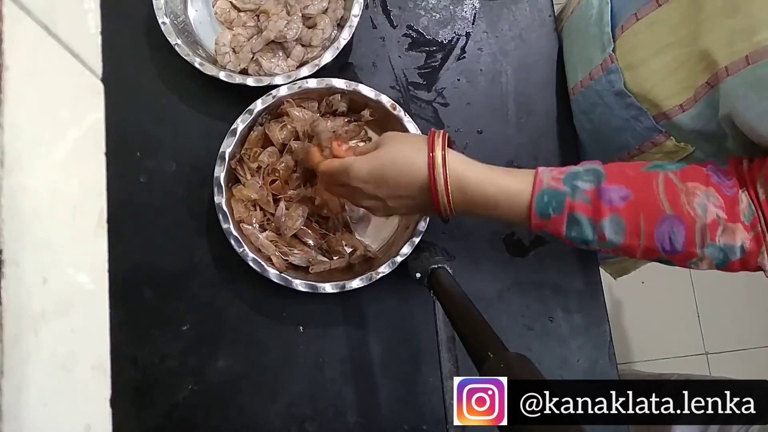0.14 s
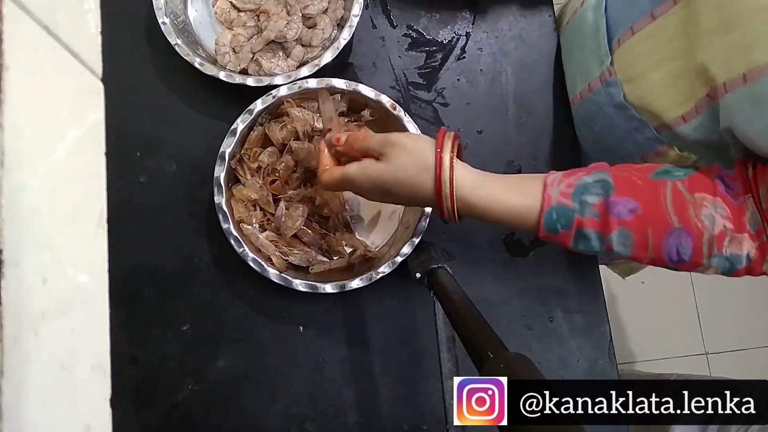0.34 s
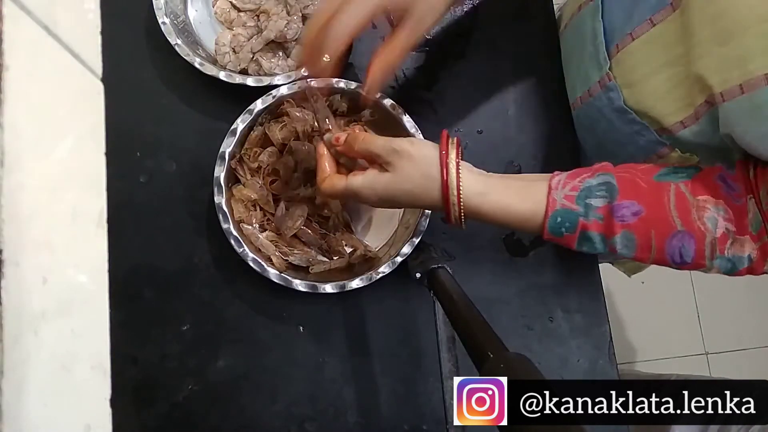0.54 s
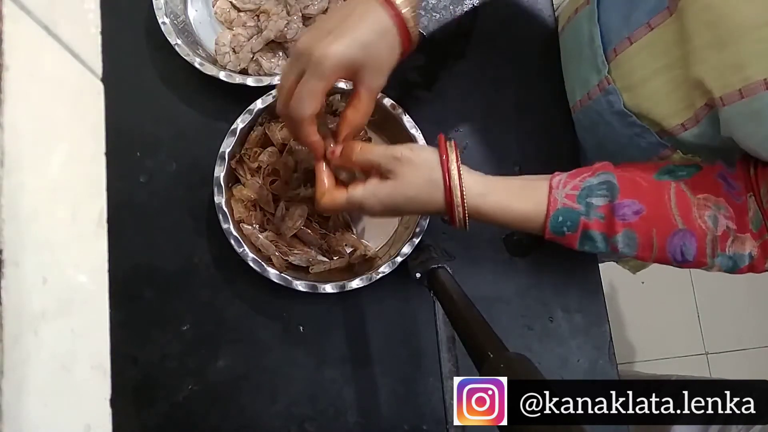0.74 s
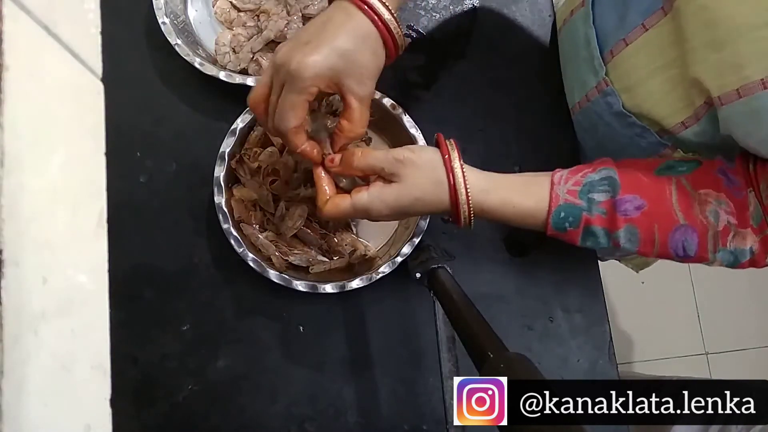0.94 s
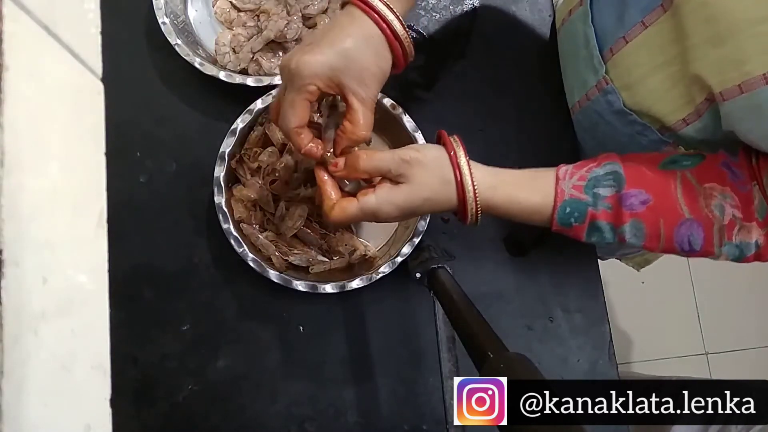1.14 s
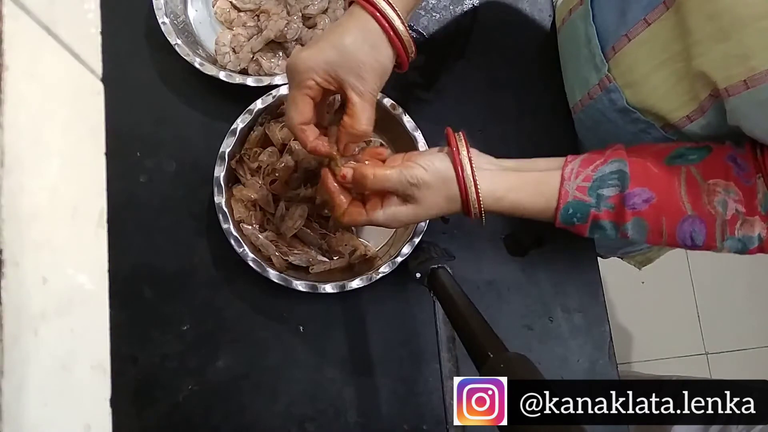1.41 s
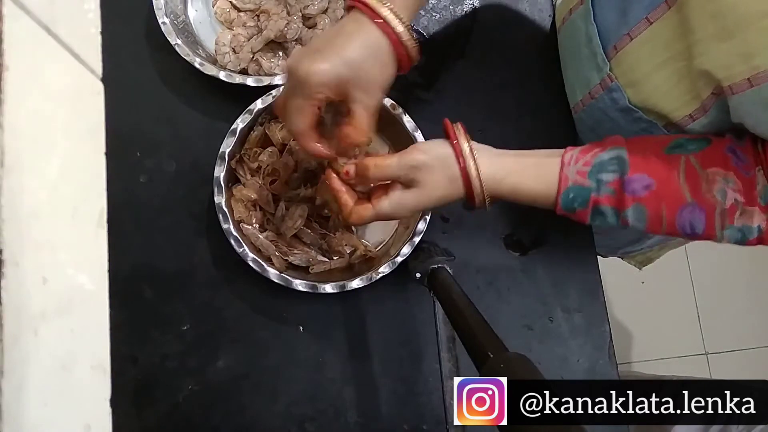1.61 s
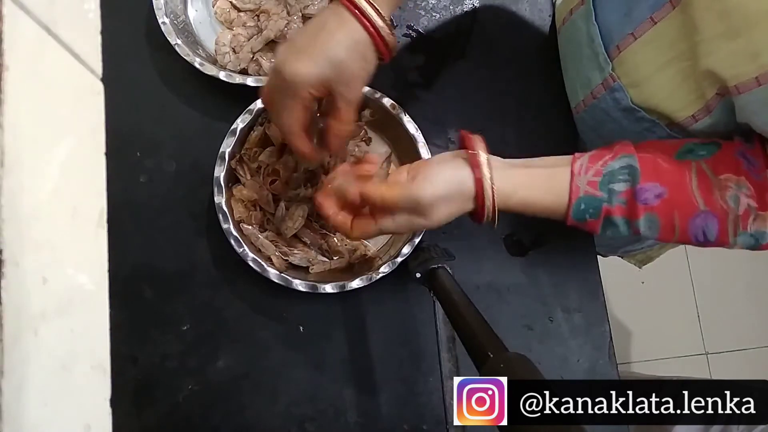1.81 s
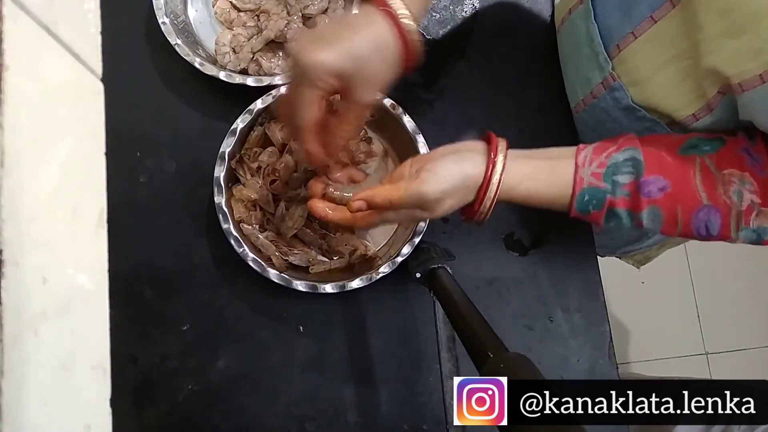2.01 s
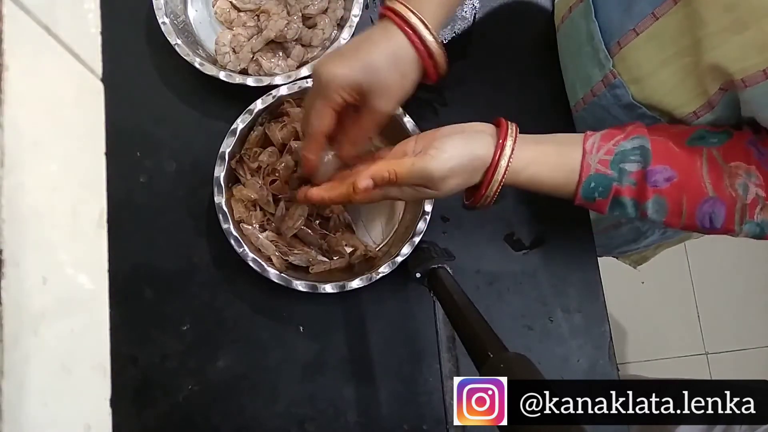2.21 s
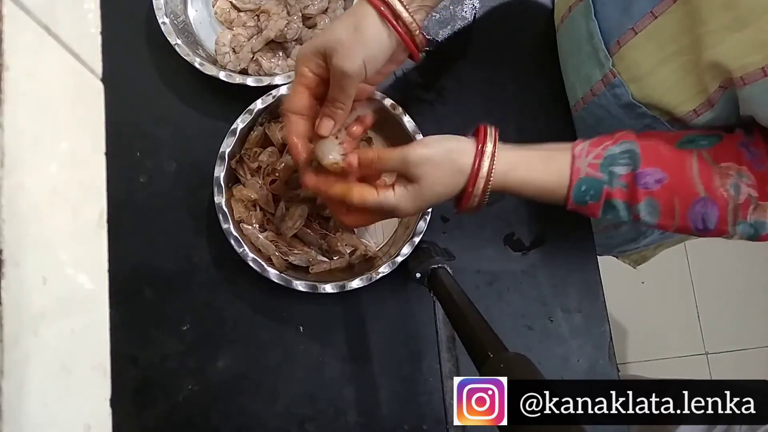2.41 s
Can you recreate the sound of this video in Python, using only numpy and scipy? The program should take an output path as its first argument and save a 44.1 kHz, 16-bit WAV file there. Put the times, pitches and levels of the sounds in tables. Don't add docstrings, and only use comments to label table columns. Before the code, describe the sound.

Prawn shells crackle wetly up close in irregular bright bursts, densest around 0.7 and 1.0 s, with snaps and slippery rubbing returning after 2 s. A distant steel dish clatters at 0.2 s, followed by dull bumps. Glass bangles clink, clearest near 0.7 and 2.0 s. A faint hinge whines early and again from 1.2 s; a faint insect joins at 1.4 s over motor hum, street murmur and gated phone hiss.

```python
import sys
import numpy as np
from scipy import signal
from scipy.fft import rfft, irfft
from scipy.io import wavfile
from scipy.ndimage import uniform_filter1d

SR = 44100
rng = np.random.default_rng(int(sys.argv[2]) if len(sys.argv) > 2 else 0)


def invert_db(level):
    return 10 ** (np.asarray(level, dtype=float) / 20)


def transcribe(signal):
    frames = np.atleast_2d(signal).T
    limited = np.clip(frames, -1, 1)
    pcm = np.round(limited * 32767).astype(np.int16)
    wavfile.write(sys.argv[1], SR, pcm)


N = 112454

# pitch_hz, level_db (per Hz)
SHELL_BRIGHT = [(5500, -14), (7500, -13.5), (9500, -1), (11200, 6.5), (13000, 0), (15000, 0.5),
                (16400, -18)]


def rms_one(x):
    return x / np.sqrt(np.mean(x ** 2) + 1e-20)


def at_hz(points, hz):
    table_hz, value = np.transpose(points)
    return np.interp(np.log(np.maximum(hz, 1)), np.log(table_hz), value)


def band(x, low_hz, high_hz, order=2):
    return signal.sosfilt(signal.butter(order, [low_hz, high_hz], "band", fs=SR, output="sos"), x)


def colour(x, spectrum):
    hz = np.fft.rfftfreq(N, 1 / SR)
    gain = invert_db(at_hz(spectrum, hz)) * (hz > spectrum[0][0]) * (hz < spectrum[-1][0])
    return irfft(rfft(x) * rms_one(gain), N)


def drift(rate_hz):
    r = np.exp(-2 * np.pi * rate_hz / SR)
    wander = signal.lfilter([1], [1, -2 * r, r * r], rng.standard_normal(N + SR))
    return rms_one(wander[SR:])


def burst(start_s, level_db, dying_s, rise_s):
    t = np.maximum(np.arange(N) / SR - start_s, 0)
    return (1 - np.exp(-t / rise_s)) * invert_db(level_db - 60 * t / dying_s)


def wide():
    # pitch_hz, left-right likeness (0 to 1)
    likeness = [(60, 1), (240, 0.77), (950, 0.12), (3770, 0.058), (15000, 0.12)]
    mid, side = rfft(rng.standard_normal((2, N)))
    alike = at_hz(likeness, np.fft.rfftfreq(N, 1 / SR))
    common = np.sqrt(1 + alike) * mid
    opposed = np.sqrt(1 - alike) * side * [[1], [-1]]
    return irfft((common + opposed) / np.sqrt(2), N)


def struck(hits, modes, spread_db, longest_s):
    chatter_s, waver_db, waver_hz = 0.01, 3.5, 25
    out = np.zeros(N)
    start_s, hit_db = np.transpose(hits)
    luck = rng.standard_normal((len(start_s), len(modes)))
    t = np.arange(600) / SR
    for k, (hz, level_db, t60) in enumerate(modes):
        clicks = np.full(N, 1e-18)
        clicks[(start_s * SR).astype(int)] = invert_db(hit_db + level_db + spread_db * luck[:, k])
        chatter = rng.standard_normal(len(t)) ** 2 * np.cos(2 * np.pi * hz * t)
        chatter = chatter * invert_db(-60 * t / chatter_s) * t ** 0.5
        push = abs(chatter @ np.exp(2j * np.pi * hz * t))
        clicks = signal.fftconvolve(clicks, chatter / push)[:N]
        r = invert_db(-60 / (min(t60, longest_s) * SR))
        w = 2 * np.pi * hz / SR
        ring = signal.lfilter([0, np.sin(w)], [1, -2 * r * np.cos(w), r * r], clicks)
        ring = ring * invert_db(waver_db * drift(waver_hz))
        out += band(ring, hz * 0.9, min(hz * 1.1, 20000))
    return out


def whine(path, octave_db):
    wobble, octave_fade_s = 0.035, 0.8
    s, hz, db = np.transpose(path)
    t = np.arange(N) / SR
    pitch = np.interp(t, s, hz) * (1 + wobble * drift(120))
    phase = 2 * np.pi * np.cumsum(pitch) / SR
    octave = invert_db(octave_db - 10 * (t - s[0]) / octave_fade_s)
    level = invert_db(np.interp(t, s, db) + 3.5) * (t > s[0]) * (t < s[-1])
    return level * (np.sin(phase) + octave * np.sin(2 * phase))


def wavering_tones(tones):
    out = 0
    for hz, width_hz, db in tones:
        r = np.exp(-np.pi * width_hz / SR)
        mid, side = rng.standard_normal((2, N + SR))
        noise = mid + 0.15 * side * [[1], [-1]]
        tone = signal.lfilter([1, 0, -1], [1, -2 * r * np.cos(2 * np.pi * hz / SR), r * r], noise)
        out = out + invert_db(db) * rms_one(tone[:, SR:])
    return out


def grains():
    per_s, spread_db = 6100, 6.5
    sizes = invert_db(spread_db * np.minimum(rng.exponential(1, N), 3)) * rng.choice([-1, 1], N)
    return rms_one(sizes * (rng.random(N) < per_s / SR))


def shells():
    # start_s, peak_db, dying_s, dull_part_db
    cracks = [(0.037, -37, 0.13, -35.5), (0.4198, -37, 0.032, -17), (0.5341, -47, 0.045, -47),
              (0.6417, -49, 0.028, -28), (0.6694, -41, 0.33, -23.5), (0.7035, -23.5, 0.091, -34.5),
              (0.899, -34.5, 0.082, -15.5), (0.9887, -28, 0.031, -26.5), (0.995, -41, 0.095, -31),
              (1.0275, -24, 0.036, -31), (1.036, -39, 0.18, -20.5), (1.0502, -28.5, 0.035, -18.5),
              (1.2328, -36, 0.058, -26.5), (1.2765, -46, 0.034, -36.5), (1.368, -71, 0.019, 5.5),
              (1.6184, -57, 0.067, -47), (1.703, -38, 0.074, -38), (1.7715, -61, 0.094, -47),
              (1.8277, -42, 0.043, -28), (1.845, -35, 0.035, -52), (1.908, -53, 0.075, -17),
              (1.9247, -38, 0.16, -22.5), (2.0163, -19, 0.022, -31.5), (2.2378, -50, 0.031, -17),
              (2.2565, -36, 0.089, -41), (2.4866, -37, 0.072, -26.5), (2.517, -39.5, 0.11, -28)]
    # pitch_hz, level_db (per Hz)
    dull_colour = [(1500, -0.5), (2200, 4.5), (3500, 3), (5000, 4.5), (6500, -10.5), (8000, 14.5)]
    rise_s = 0.0013
    bits = grains()
    bright = sum(burst(s, db - 7, dying_s, rise_s) for s, db, dying_s, _ in cracks)
    dull = sum(burst(s, db + dull_db, dying_s, rise_s) for s, db, dying_s, dull_db in cracks)
    return colour(bits, SHELL_BRIGHT) * bright + colour(bits, dull_colour) * dull


def snaps():
    # start_s, peak_db
    lone = [(.0003, -54), (.6958, -33), (.6983, -33), (.7025, -31), (.7132, -33), (.9932, -40),
            (1.0297, -26), (1.0325, -37), (1.0518, -35), (1.3675, -52), (1.703, -46), (2.0186, -28),
            (2.2587, -31), (2.4872, -43), (2.5158, -46)]
    out = np.full(N, 1e-18)
    start_s, peak_db = np.transpose(lone)
    out[(start_s * SR).astype(int)] = invert_db(peak_db + 12)
    return band(out, 9500, 13500, order=3)


def rubs():
    # start_s, level_db, dying_s, rise_s
    strokes = [
        (0.037, -55, 0.19, 0.0016),
        (.663, -48, 0.2, 0.0023),
        (0.693, -38, 0.29, 0.0037),
        (1.595, -57.5, 0.51, 0.032),
        (2.06, -61, 1.4, 0.024),
        (2.23, -47, 0.29, 0.0069),
        (2.26, -47.5, 0.27, 0.0022),
        (2.36, -59, 1.08, 0.068),
        (2.468, -49.5, 0.27, 0.015),
    ]
    rustle = colour(rng.standard_normal(N), SHELL_BRIGHT) * invert_db(3.0 * drift(150))
    return rustle * sum(burst(*stroke) for stroke in strokes)


def bangles():
    # start_s, peak_db
    touches_a = [(0.0396, -46), (0.6639, -41), (0.6745, -39), (0.696, -25.5), (0.7015, -36), (0.7105, -33),
                 (0.727, -34), (1.3668, -46.5), (1.645, -45.5), (1.655, -52.5), (1.7692, -44.5),
                 (2.2365, -33.5), (2.2585, -34), (2.274, -33), (2.5132, -37.5)]
    # pitch_hz, level_db, t60_s
    modes_a = [(4175, -27, 0.034), (5780, -21, 0.05), (8050, -16.5, 0.042), (11220, -10, 0.04),
               (11010, -3, 0.051), (13000, -11.5, 0.044), (15200, -23, .025)]
    # start_s, peak_db
    touches_b = [
        (1.8447, -44.5),
        (2.0172, -25.5),
        (2.0344, -39.5),
        (2.0617, -45),
        (2.4872, -47),
    ]
    # pitch_hz, level_db, t60_s
    modes_b = [(5060, -26, 0.049), (7200, -20, 0.0073), (9490, -6, 0.035), (10960, 5.5, 0.022),
               (12200, -22, 0.011), (15360, 2.5, 0.027)]
    ring_s = 0.03
    return struck(touches_a, modes_a, 4, ring_s) + struck(touches_b, modes_b, 2, 2 * ring_s)


def dish():
    # start_s, level_db
    rattle = [
        (.202, -36),
        (.207, -36.5),
        (.218, -36.5),
        (.231, -38.5),
        (.253, -40),
        (.29, -50),
    ]
    # pitch_hz, level_db, t60_s
    modes = [(874.3, -5.5, .2), (1079, -21, 0.13), (1621, -13, 0.24), (1891.5, -1.5, .2), (2157, -5, 0.11),
             (2806, -8, .2), (3017, -5.5, 0.064), (3810, -13.5, 0.079), (4403, -1.5, 0.046),
             (4833, -7, 0.042), (5320, -10.5, 0.089), (5640, -16, .15), (6360, -17.5, 0.19),
             (2336, -9, 0.027)]
    # start_s, level_db, dying_s
    clatter = [
        (0.2016, -22.5, 0.076),
        (0.207, -36, 0.034),
        (.285, -38.5, 0.074),
        (0.337, -38, 0.046),
    ]
    # pitch_hz, level_db (per Hz)
    splash_colour = [(5000, -15), (7500, -8.5), (9700, 0.5), (12500, -11.5), (15500, -23.5)]
    splash = colour(rng.standard_normal(N), splash_colour)
    splash = splash * sum(burst(s, db, dying_s, 0.00026) for s, db, dying_s in clatter)
    return splash + struck(rattle, modes, 2, 0.12)


def bumps():
    # start_s, level_db, dying_s, top_hz
    knocks = [
        (0.201, -40, 0.16, 1620),
        (0.2, -41.5, 0.21, 438),
        (0.687, -46, 0.19, 1710),
        (0.773, -42.5, 0.2, 1290),
        (0.903, -48, 0.11, 850),
        (1.233, -111, 0.036, 2630),
        (1.923, -52.5, 0.088, 3240),
    ]
    out = np.zeros(N)
    for s, db, dying_s, top_hz in knocks:
        thud = rms_one(band(rng.standard_normal(N), 150, top_hz))
        out += thud * burst(s, db, dying_s, 0.0022)
    return out


def hinge():
    # start_s, pitch_hz, level_db
    first = [
        (.05, 1330, -95),
        (.08, 1340, -77.5),
        (.13, 1370, -74.5),
        (.16, 1460, -64.5),
        (.2, 1575, -62),
        (.3, 1650, -91),
        (.36, 1630, -96),
    ]
    # start_s, pitch_hz, level_db
    second = [
        (1.2, 1164, -149),
        (1.235, 1187, -65),
        (1.33, 1252, -69),
        (1.4, 1348, -63),
        (1.47, 1340, -59.5),
        (1.55, 1408, -71.5),
        (1.7, 1414, -74.5),
        (1.9, 1413, -93),
        (1.96, 1360, -102),
    ]
    return whine(first, -20) + whine(second, -3)


def motor():
    # pitch_hz, width_hz, level_db
    resonances = [(96, 9.8, -63.5), (128, 21, -62.5), (163.4, 6, -63.5), (212.9, 4.9, -71.5),
                  (382.6, 12, -75)]
    # middle_s, pitch_hz, level_db, length_s
    throbs = [(0.785, 219, -51.5, 0.061), (0.917, 155, -52.5, 0.29), (1.066, 205, -50, .07),
              (1.571, 212, -47.5, 0.074), (1.719, 158, -51, 0.16), (1.844, 222, -53, 0.11),
              (1.997, 156, -50.5, 0.15), (2.125, 218, -54, 0.088), (2.214, 160, -50.5, 0.056)]
    # start_s, pitch_hz, level_db
    main_tone = [(0.0, 96.3, -41), (0.01, 97.4, -59.5), (0.21, 96.2, -50.5), (0.3, 96.18, -57),
                 (1.23, 96.36, -48), (1.4, 95.6, -57), (1.43, 96, -45.5), (1.54, 97.8, -58.5),
                 (1.55, 97, -63), (1.57, 94.7, -43), (1.66, 94.8, -63), (1.71, 96.2, -48),
                 (2.19, 97.9, -56.5), (2.2, 97.57, -48), (2.48, 97.3, -52), (2.55, 103, -54.5)]
    pan_db = -0.36
    t = np.arange(N) / SR
    casing = np.zeros(N)
    for s, hz, db, length_s in throbs:
        casing += invert_db(db) * np.exp(-8 * ((t - s) / length_s) ** 2) * np.sin(2 * np.pi * hz * t)
    hum = wavering_tones(resonances) + casing + whine(main_tone, -37.5) / 2 ** 0.34
    return hum * invert_db([[pan_db], [-pan_db]])


def insect():
    # pitch_hz, width_hz, level_db
    song = [(3497, 18.5, -81), (3225, 28, -85)]
    from_s, fade_in_s = 1.435, 0.048
    return wavering_tones(song) * np.clip((np.arange(N) / SR - from_s) / fade_in_s, 0, 1)


def street():
    # pitch_hz, level_db (per Hz)
    murmur = [(12, -60), (20, 2.5), (43, -18.5), (107, 0), (549, -25), (744, -23.5), (929, -40.5),
              (1310, -30), (2500, -50), (3250, -122), (5500, -120)]
    # start_s, level_db
    swell = [(0, 7), (.12, -2.5), (.5, -2.5), (.8, 2), (1.201, 0.5), (1.7, 4.5), (2.1, -0.5), (2.55, -7)]
    level_db = -56.5 + np.interp(np.arange(N) / SR, *np.transpose(swell))
    return invert_db(level_db + 2.4 * drift(3.0)) * colour(wide(), murmur)


def gate(clicks):
    open_at_db, shut_db, closing_db_per_s = -44, -28, 97.5
    treble_power = uniform_filter1d(np.diff(clicks, 2, prepend=[0, 0]) ** 2, size=64)
    level_db = 10 * np.log10(treble_power + 1e-12) - open_at_db
    ramp = closing_db_per_s * np.arange(N) / SR
    held_db = np.maximum.accumulate(np.minimum(level_db, 0) + ramp) - ramp
    return invert_db(np.maximum(held_db, shut_db))


def gated_hiss(clicks):
    # pitch_hz, level_db (per Hz)
    hiss_colour = [(900, -46), (1900, -4), (2700, -15), (4000, -7), (6300, -8), (8000, -3.5), (11000, 1.5),
                   (16000, -11)]
    treble_hz, treble_open_db = 13100, 2.5
    top = signal.butter(6, treble_hz, "high", fs=SR, output="sos")
    body = signal.butter(6, treble_hz, "low", fs=SR, output="sos")
    noise = invert_db(-61.5) * colour(wide(), hiss_colour)
    body_hiss = gate(clicks) * signal.sosfilt(body, noise)
    top_gate = gate(invert_db(treble_open_db) * signal.sosfilt(top, clicks))
    return body_hiss + top_gate * signal.sosfilt(top, noise)


def room(x):
    # pitch_hz, t60_s
    decay = [(200, 0.52), (1000, 0.64), (3000, 0.46), (8000, 0.24), (15000, 0.19)]
    t = np.arange(SR) / SR
    edges_hz = 60 * 2 ** np.arange(0, 8.6, 0.5)
    noise = wide()[:, :SR]
    tail = 0
    for low_hz, high_hz in zip(edges_hz, edges_hz[1:]):
        t60 = at_hz(decay, low_hz)
        tail = tail + band(noise, low_hz, high_hz) * invert_db(-60 * t / t60) / np.sqrt(t60)
    tail = tail * (1 - np.exp(-t / 0.004))
    return signal.fftconvolve(x[None], rms_one(tail) / np.sqrt(SR), axes=1)[:, :N]


def shut_weak_bands(x):
    # pitch_hz, level_db (per bin)
    noise_floor = [(300, -120), (650, -85), (1500, -89), (2800, -91), (4500, -94), (6300, -94), (9000, -96),
                   (14000, -97)]
    memory, depth_db, doubt_db, masked_db = 0.88, -32, 5.5, -13
    hz, _, z = signal.stft(x, SR, nperseg=512, noverlap=384)
    doubt = uniform_filter1d(rng.standard_normal(z.shape[1:]), size=40, axis=1)
    doubt = rms_one(uniform_filter1d(doubt, size=2, axis=0))
    power = uniform_filter1d(np.mean(np.abs(z) ** 2, axis=0), size=2, axis=0)
    recent = np.maximum(power / 4, signal.lfilter([1 - memory], [1, -memory], power))
    masked = invert_db(2 * masked_db) * uniform_filter1d(recent, size=16, axis=0) * (hz[:, None] > 1500)
    floor = np.maximum(masked, invert_db(2 * at_hz(noise_floor, hz))[:, None])
    over = recent / floor / invert_db(2 * doubt_db * doubt)
    gain = np.maximum(over ** 3 / (1 + over ** 3), invert_db(depth_db))
    return signal.istft(z * gain, SR, nperseg=512, noverlap=384)[1][:, :N]


def scene():
    near_wet_db, far_wet_db, left_db = -7, 2.5, 2.5
    near = shells() + snaps() + rubs() + bangles()
    far = dish() + bumps() + hinge()
    direct = near + 0.56 * far
    direct_pair = np.array([np.roll(direct, 1), direct])
    wet = room(invert_db(near_wet_db) * near + invert_db(far_wet_db) * far)
    air = motor() + insect() + street()
    mix = direct_pair + wet + air + gated_hiss(near + far)
    return mix * invert_db([[left_db], [-left_db]])


def band_limit(x):
    return signal.sosfilt(signal.butter(12, 16830, fs=SR, output="sos"), x)


def record(dry):
    top_cut = signal.cheby2(12, 60, 16500, fs=SR, output="sos")
    finished = signal.sosfilt(top_cut, shut_weak_bands(dry))
    return band_limit(finished)


dry = scene()
out = record(dry)
transcribe(out)
```